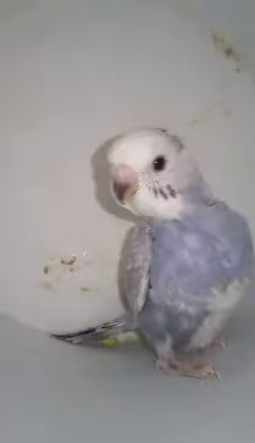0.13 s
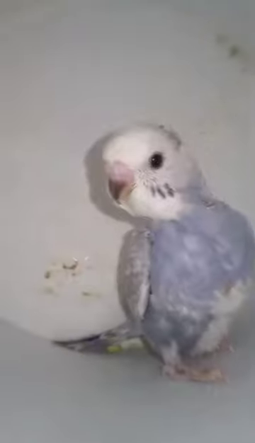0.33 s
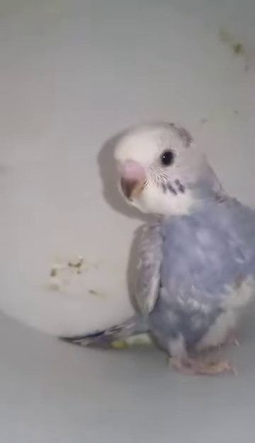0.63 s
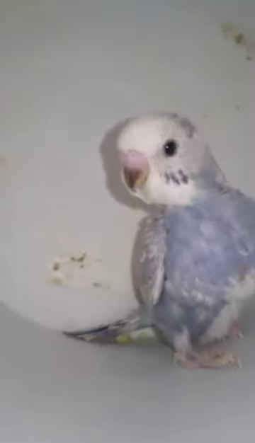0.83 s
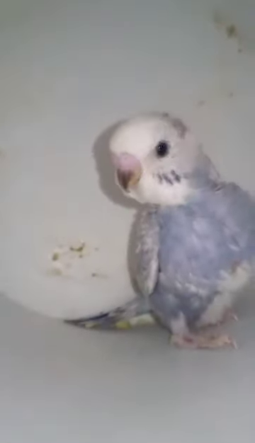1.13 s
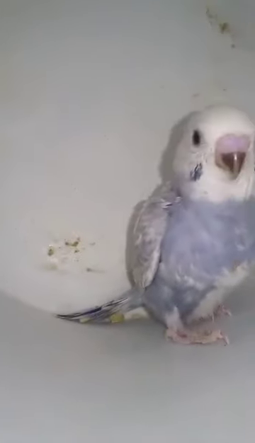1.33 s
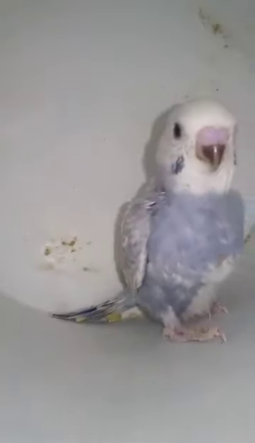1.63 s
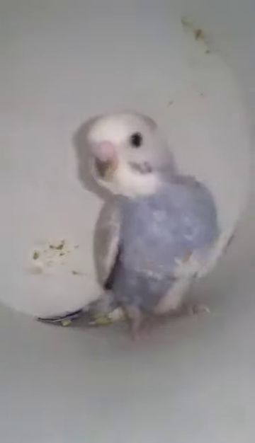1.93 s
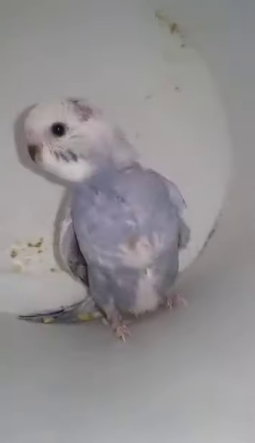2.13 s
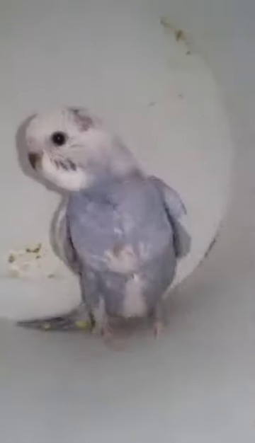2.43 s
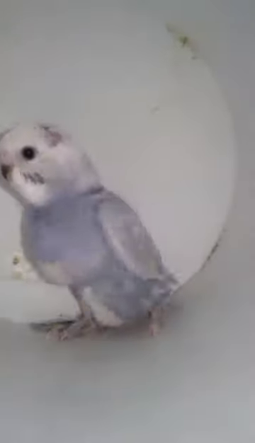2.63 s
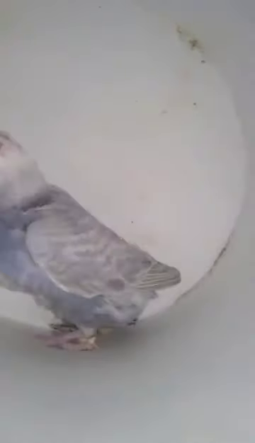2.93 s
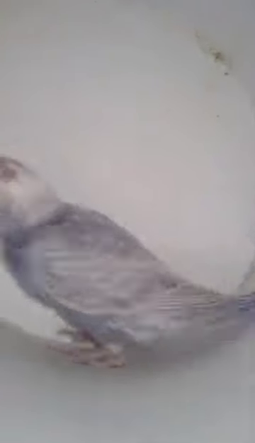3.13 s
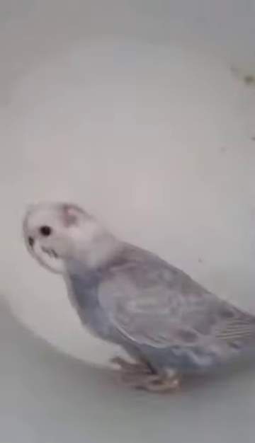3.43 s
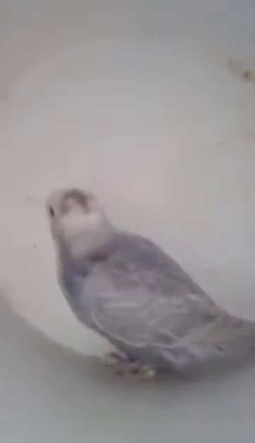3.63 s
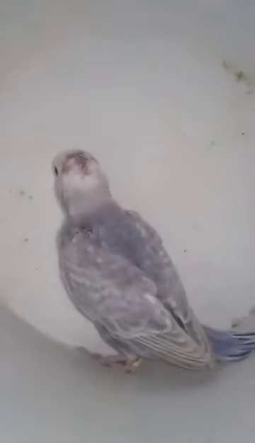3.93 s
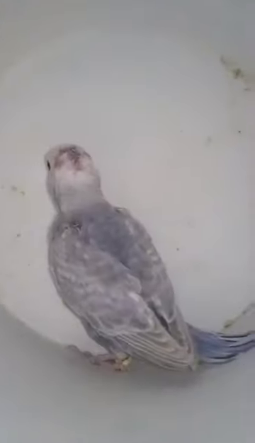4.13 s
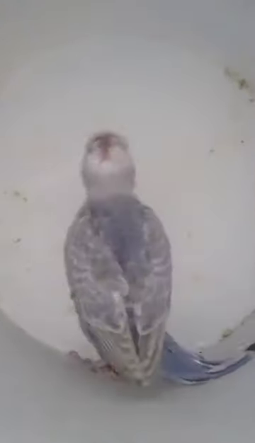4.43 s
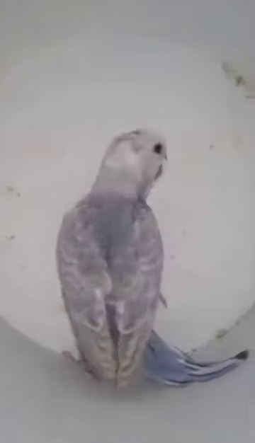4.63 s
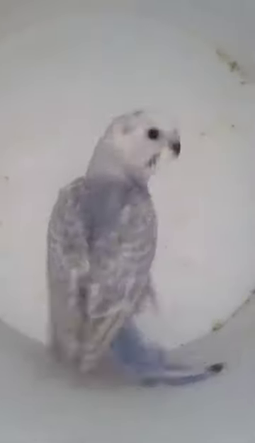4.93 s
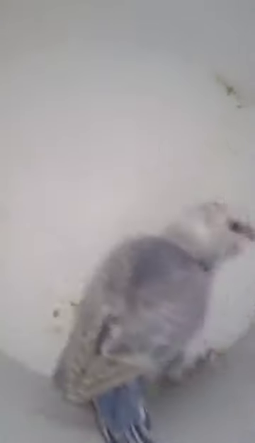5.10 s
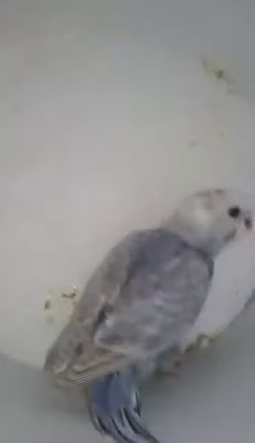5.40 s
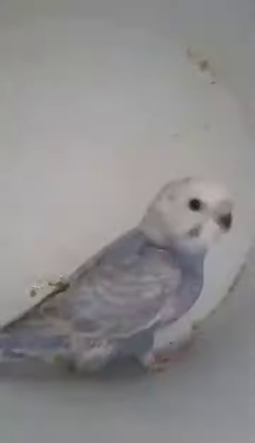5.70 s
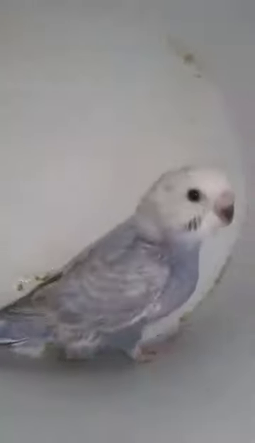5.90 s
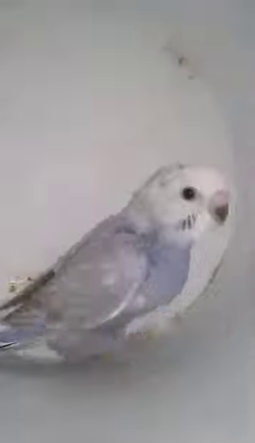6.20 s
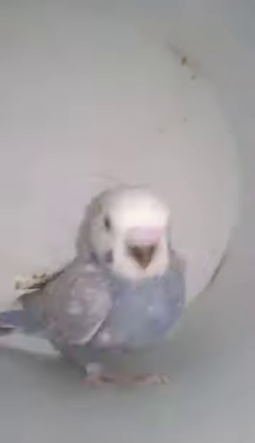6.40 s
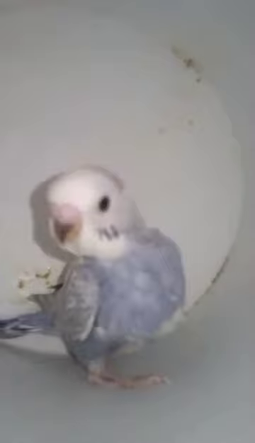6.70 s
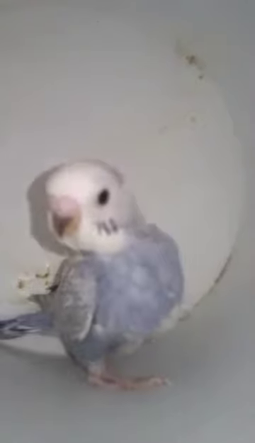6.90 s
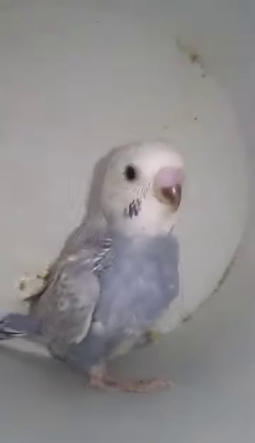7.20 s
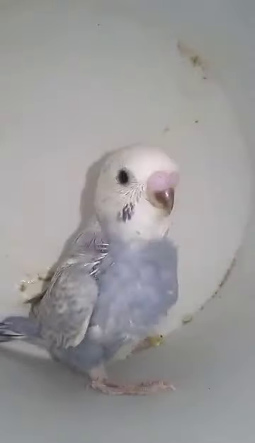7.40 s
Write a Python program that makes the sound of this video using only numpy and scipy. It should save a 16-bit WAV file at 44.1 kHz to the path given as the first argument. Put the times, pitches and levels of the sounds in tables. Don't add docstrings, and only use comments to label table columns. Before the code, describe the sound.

Budgerigars start faintly, then swell into a fast raspy hissing chatter in a hard room, with bowl knocks and sharp claw clicks.

```python
import sys
import numpy as np
from scipy import signal
from scipy.fft import rfft, irfft, next_fast_len
from scipy.io import wavfile
from scipy.ndimage import uniform_filter1d

SR = 44100
rng = np.random.default_rng(int(sys.argv[2]) if len(sys.argv) > 2 else 0)


def waveform_to_disk(signal):
    frames = np.transpose(np.atleast_2d(signal))
    scaled = np.clip(frames, -1, 1) * 32767
    samples = np.round(scaled).astype(np.int16)
    wavfile.write(sys.argv[1], SR, samples)


def natural_amplitude(level_db):
    exponent = np.asarray(level_db, float) / 20
    return 10 ** exponent


N = 332955


def highpass(x, hz):
    return signal.sosfilt(signal.butter(4, hz, "high", fs=SR, output="sos"), x)


def bandpass(x, low_hz, high_hz, order=2):
    return signal.sosfilt(signal.butter(order, [low_hz, high_hz], "band", fs=SR, output="sos"), x)


def rms_one(x):
    return x / np.sqrt(np.mean(x ** 2) + 1e-20)


def peak_one(x):
    return x / np.max(np.abs(x))


def in_time(rows, outside=None):
    s, *columns = np.transpose(rows)
    return [np.interp(np.arange(N) / SR, s, c, outside, outside) for c in columns]


def drift(rate, size):
    r = np.exp(-2 * np.pi * rate * 20 / SR)
    slow = signal.lfilter([1], [1, -2 * r, r * r], rng.standard_normal(size // 20 + 1002))[1000:]
    return np.interp(np.arange(size) / 20, np.arange(len(slow)), rms_one(slow))


def resonate(x, hz, width_hz):
    r = np.exp(-np.pi * width_hz / SR)
    turn = 2 * np.pi * hz / SR
    return signal.lfilter([(1 - r * r) / 2, 0, (r * r - 1) / 2], [1, -2 * r * np.cos(turn), r * r], x)


def resonate_twice(x, hz, width_hz):
    return resonate(resonate(x, hz, width_hz), hz, width_hz)


def ring(push, hz, t60):
    r, turn = natural_amplitude(-60 / (t60 * SR)), 2 * np.pi * hz / SR
    return signal.lfilter([0, np.sin(turn)], [1, -2 * r * np.cos(turn), r * r], push + 1e-18)


VALLEY_HZ, VALLEY_OCTAVES = 4240, 0.47


def patchy_noise(colour, edges_hz, levels_db, count, slow_db, fast_db, hollow_db=0, lifts=()):
    hz, db = np.transpose(colour)
    bands = np.geomspace(hz[0], hz[-1], count + 1)
    power = np.zeros(len(levels_db))
    groups, white = np.zeros((len(levels_db), N)), rng.standard_normal((2, N))
    for k, (low, high) in enumerate(zip(bands, bands[1:])):
        centre = np.sqrt(low * high)
        band = bandpass(white[k % 2], low, high)
        gain_db = np.interp(np.log(centre), np.log(hz), db)
        gain_db = gain_db + slow_db * drift(4.14, N) + fast_db * drift(24.7, N)
        for path_hz, lift_db, octaves in lifts:
            gain_db = gain_db + lift_db * np.exp(-(np.log2(centre / path_hz) / octaves) ** 2)
        group = np.searchsorted(edges_hz, centre)
        power[group] += np.mean((natural_amplitude(gain_db) * band) ** 2)
        valley = np.exp(-(np.log2(centre / VALLEY_HZ) / VALLEY_OCTAVES) ** 2)
        groups[group] += natural_amplitude(gain_db - hollow_db * valley) * band
    return sum(natural_amplitude(level) * group / np.sqrt(p) for level, group, p in zip(levels_db, groups, power))


def tone(rows, wobble):
    hz, *levels_db = in_time(rows)
    on = uniform_filter1d(in_time([(rows[0][0], 1), (rows[-1][0], 1)], 0)[0], size=900)
    phase = 2 * np.pi * np.cumsum(hz * (1 + wobble * drift(24.5, N))) / SR
    return on * sum(np.sqrt(2) * natural_amplitude(db) * np.sin((k + 1) * phase) for k, db in enumerate(levels_db))


# frequency in Hz, level in dB per Hz.
RUMBLE_COLOUR = [(18, -54), (30, -16.5), (125, -15), (166, -7), (293, -8), (387, -16), (459, -10),
                 (598, -14), (700, -10.5), (910, -54), (1540, -120)]
# start in seconds, end in seconds, rub in dB, bass weight in dB.
SHUFFLES = [(0.224, 0.556, -81, 23), (0.727, 0.824, -56, -16), (1.12, 1.546, -62.5, 3),
            (1.807, 2.034, -60.5, -4), (2.407, 2.655, -56.5, -2), (3.052, 3.28, -58, -8),
            (3.35, 3.596, -58.5, -7), (3.614, 3.935, -47, -6), (3.98, 4.257, -62.5, -18),
            (4.286, 4.434, -49.5, -25), (4.926, 5.186, -45.5, -12), (5.166, 5.4, -48, -5),
            (5.4, 5.578, -47, -5.5), (5.577, 5.786, -47.5, -8), (5.79, 6.074, -59, 0.5),
            (6.172, 6.384, -46.5, -18), (6.81, 7.2, -47, -12), (7.148, 7.38, -54, -13),
            (7.419, 7.6, -47.5, -9), (4.8, 4.87, -60, -3), (2.106, 2.2, -66, -8), (5.948, 6.057, -55, -15)]


def shuffling(bass_still_db=-70.5, mids_still_db=-68, edge_s=0.12):
    t = np.arange(N) / SR
    power = natural_amplitude([2 * bass_still_db, 2 * mids_still_db])[:, None] * np.ones(N)
    for start, end, db, bass_db in SHUFFLES:
        hold = np.clip(0.5 + np.minimum(t - start, end - t) / edge_s, 0, 1)
        power = power + np.outer(natural_amplitude([2 * (db + bass_db), 2 * db]), hold ** 2)
    return patchy_noise(RUMBLE_COLOUR, [160], 10 * np.log10(power), count=9, slow_db=1.5, fast_db=3.0)


# frequency in Hz, width in Hz, level in dB.
STANDING_WAVES = [(131, 14, 1), (348, 20, 1), (731, 28, 2), (846, 18, 4), (1011, 18, 3), (1471, 18, 4)]


def standing_waves(x):
    return sum(natural_amplitude(db) * resonate(x, hz, width_hz) for hz, width_hz, db in STANDING_WAVES)


# time in seconds, level in dB, shrillness in dB.
EFFORT = [(0, -39, -5.5), (.14, -51.5, 0.5), (.24, -57, 4), (.29, -51, 1), (.4, -48, -3.5),
          (.59, -48.5, -3), (0.899, -50, 1.5), (1.2, -47, -4.5), (1.75, -45.5, -3), (1.96, -48.5, 1),
          (1.975, -43, 1), (2.54, -36.5, 1.5), (2.86, -31.5, 3), (3.15, -29.5, 1), (3.41, -36, 2.5),
          (3.83, -29, 1.5), (4.46, -31, 3), (5.0, -34, -1.5), (5.14, -34.5, 2), (5.22, -33, 2),
          (5.3, -34.5, 4), (5.36, -33.5, 1), (5.45, -33.5, 2.5), (5.751, -35.5, -0.2), (6.311, -32.5, 2),
          (6.7, -31.5, -1), (7.55, -31, 1.5)]
# frequency in Hz, level in dB.
WASH_COLOUR = [(600, -25.5), (720, -16.5), (1100, -8.5), (1740, -7), (3460, -2), (4810, -3.5), (6430, -4),
               (9000, -8.5), (14000, -5)]
REGISTER_EDGES_HZ = (1800, 4400, 7200)
# time in seconds, lower resonance in Hz,
# upper resonance in Hz, chest weight in dB.
FAR_THROATS = [(0, 3200, 5600, 2), (.3, 2600, 5600, -4), (.6, 2600, 6400, -2), (.9, 2500, 5700, -4),
               (1.2, 2580, 5200, 1), (1.45, 2000, 5800, -2), (1.7, 1990, 5600, 0.5),
               (1.9, 3070, 6300, 2), (2.01, 4250, 6210, -4.5), (2.1, 2960, 5770, 0.5),
                (2.34, 4100, 5810, 1), (2.45, 3260, 5500, 1.5), (2.58, 4240, 6120, 3),
                (2.73, 3540, 5800, -1.5), (3.24, 3300, 6400, 0.5), (3.44, 3850, 5560, 0.5),
                (3.88, 3360, 6040, -1.5), (4.04, 3900, 5750, 1), (5.41, 2980, 6200, 0),
                (5.55, 4100, 6390, -0.5), (5.61, 2880, 5640, 1), (5.94, 4170, 6640, -1),
                (6.01, 3240, 6270, -0.5), (6.98, 3540, 5500, 1), (7.55, 3870, 5660, 0)]
# time in seconds, depth in dB.
HOLLOW = [(0.08, 0), (.17, 8), (.26, 4), (.5, 1.5), (.85, 3.5), (.92, 4), (1, 0.5), (2.3, 0), (2.5, 5.5),
          (2.7, 0.5), (3.0, -1), (3.2, 4), (3.4, -1.5), (3.7, 1), (3.95, -1), (4.2, -1), (5.1, 2),
          (5.2, 5.5), (5.28, 11), (5.34, 0.5), (5.7, 4), (5.9, 2), (7.55, -1)]


def chorus(swell, echo_db=(-42, -2.5, -3.5, -5.5), echo_s=0.035):
    level, shrill = in_time(EFFORT)
    low_hz, high_hz, chest_db = in_time(FAR_THROATS)
    lows = -41 + chest_db + 0.84 * (level + 31)
    steady = [lows, level, level + shrill, level + shrill - 4]
    r = np.exp(-1 / (echo_s * SR))
    low, high = signal.lfilter([1 - r], [1, -r], swell ** 2)
    levels = []
    for db, e_db, echo in zip(steady, echo_db, [low + high, low, high, high]):
        levels.append(10 * np.log10(natural_amplitude(2 * db) + natural_amplitude(2 * e_db) * echo))
    faint_db = (-37 - level).clip(0)
    return patchy_noise(WASH_COLOUR, REGISTER_EDGES_HZ, levels, count=26,
                        slow_db=1.8 + 0.12 * faint_db, fast_db=1.52,
                        hollow_db=in_time(HOLLOW)[0] + 0.27 * faint_db,
                        lifts=[(low_hz, 3, 0.57), (high_hz, 1, 0.15)])   # path, dB, octaves


# start in seconds, end in seconds, start in Hz, end in Hz, level in dB.
PEEPS = [(0.09, 0.19, 1650, 1750, -47), (0.2, 0.32, 2200, 2600, -55), (0.19, 0.25, 3100, 3800, -57),
         (0.39, 0.5, 1300, 1550, -52), (0.43, 0.46, 2800, 2300, -53), (0.1, 0.46, 5500, 5100, -50),
         (0.72, 0.92, 2560, 2600, -45.5), (0.55, 1.3, 2800, 2560, -54), (0.942, 1.06, 770, 723, -56),
         (1.027, 1.298, 2733, 2640, -38.5), (1.069, 1.177, 1493, 1700, -45.5),
         (1.287, 1.61, 1900, 1870, -47), (1.358, 1.5, 3840, 3880, -46), (1.06, 1.12, 3750, 4500, -40.5),
         (1.094, 1.218, 5160, 5100, -44), (3.061, 3.23, 520, 410, -53), (4.329, 4.547, 250, 342, -50.5),
         (4.492, 4.946, 230, 380, -54), (1.08, 1.16, 3200, 2500, -37), (0.93, 1.01, 5750, 5300, -49),
         (0.9, 1.0, 2260, 2240, -50), (4.85, 5.3, 1800, 1200, -41.5), (2.55, 3.45, 840, 1010, -48),
         (1.41, 1.5, 290, 340, -55), (1.15, 1.3, 320, 260, -49.5), (.35, .46, 2800, 3300, -55),
         (1.85, 1.92, 1200, 850, -56), (1.85, 1.92, 338, 306, -54), (0.72, 0.84, 800, 1400, -52.5)]


def peeps(breathy=0.032):
    out = np.zeros(N)
    for start, end, from_hz, to_hz, db in PEEPS:
        at, size = round(start * SR), round((end - start) * SR)
        phase = 2 * np.pi * np.cumsum(np.linspace(from_hz, to_hz, size)) / SR
        flutter = drift(breathy * to_hz + 20, SR)[:size]
        out[at:at + size] += natural_amplitude(db) * np.sqrt(np.hanning(size)) * flutter * np.sin(phase)
    return out


# time in seconds, pitch in Hz, then fundamental, octave and third partial in dB.
SQUEAK = [
    (.172, 1090, -58, -64, -66),
    (.19, 1120, -52, -62, -63),
    (.226, 1235, -50, -64, -65),
    (.33, 1265, -50, -64, -76),
    (.42, 1290, -49, -65, -75),
    (.47, 1265, -54, -66, -80),
    (.53, 1200, -66, -75, -85),
]


def squeak():
    return tone(SQUEAK, wobble=0.018) * (1.05 + 0.3 * drift(60.0, N))


# peak in seconds, leading resonance in Hz, level in dB, length in seconds.
SHRILL = [(0.284, 5800, -50, 0.08), (0.758, 6100, -53, 0.1), (1.366, 5640, -43.5, 0.032),
          (1.502, 5500, -38, 0.019), (1.55, 5800, -32.5, 0.031), (1.921, 6700, -34.5, 0.035),
          (2.172, 5970, -34, 0.022), (2.036, 6440, -44, 0.026), (1.973, 6750, -40, 0.022),
          (2.097, 5900, -36, 0.025), (2.246, 6400, -46, 0.034), (2.302, 6320, -36.5, 0.036),
          (2.755, 5250, -37, 0.035), (3.28, 5600, -32, 0.027), (3.38, 5860, -44, 0.029),
          (3.456, 5700, -35, 0.046), (3.532, 5800, -38, 0.036), (3.785, 6000, -28.5, 0.036),
          (4.595, 5500, -30, 0.023), (4.948, 6540, -33, 0.032), (5.079, 5600, -39, 0.024),
          (5.807, 5750, -30, 0.047), (6.413, 5900, -28.5, 0.029), (6.874, 5780, -35, 0.04),
          (7.411, 5400, -34, 0.06), (2.641, 6350, -26, 0.018), (2.794, 5280, -21, 0.041),
          (3.345, 5530, -33, 0.05), (3.73, 5900, -24, 0.045), (3.839, 6430, -24, 0.03),
          (3.904, 6320, -24.5, 0.043), (4.126, 5460, -24.5, 0.031), (4.244, 5720, -25.5, 0.086),
          (4.357, 5880, -29, 0.058), (4.418, 5500, -22, 0.016), (4.528, 6620, -26, 0.076),
          (4.668, 5400, -25.5, 0.025), (4.895, 6500, -28, 0.072), (5.013, 5800, -31.5, 0.056),
          (5.246, 5740, -24, 0.03), (5.339, 6130, -27.5, 0.041), (5.484, 6600, -34, 0.054),
          (5.604, 5710, -27, 0.052), (5.738, 6030, -28, 0.023), (5.859, 6530, -24, 0.053),
          (6.128, 6220, -29, 0.063), (6.559, 5880, -23, 0.051), (6.353, 6160, -31, 0.015),
          (6.82, 5770, -24.5, 0.021), (7.227, 5960, -24.5, 0.032)]
THROATY = [(0.984, 1790, -45.5, 0.084), (1.077, 2610, -39, 0.039), (1.139, 2380, -41, 0.016),
           (1.25, 2200, -44, 0.05), (1.85, 4570, -40, 0.019), (1.917, 3400, -37.5, 0.045),
           (1.978, 4380, -32, 0.032), (2.039, 3490, -34, .035), (3.585, 3700, -38, 0.021),
           (5.484, 3440, -35.5, 0.025), (5.525, 4360, -35.5, 0.037), (7.522, 4250, -34, 0.026),
           (2.104, 2800, -36, 0.06), (2.235, 3540, -33.5, 0.034), (2.17, 4690, -32.5, 0.028),
           (2.374, 4000, -31.5, 0.026), (2.585, 4300, -27, 0.027), (2.701, 4030, -29.5, 0.026),
           (2.905, 2760, -35, 0.031), (3.062, 4030, -26.5, 0.043), (3.128, 3120, -28, 0.038),
           (3.182, 3310, -26.5, 0.041), (3.486, 4260, -34, 0.0097), (3.65, 3830, -28, 0.044),
           (4.077, 4050, -29.5, 0.037), (4.168, 4400, -30, 0.016), (5.598, 2930, -29.5, 0.053),
           (6.07, 2830, -32, 0.014), (6.427, 2350, -35, 0.064), (6.498, 3020, -34.5, 0.064),
           (6.623, 4120, -27.5, 0.087), (6.895, 4600, -24.5, 0.049), (6.996, 4200, -27, 0.056),
           (7.07, 3700, -30, 0.035), (7.177, 4330, -25, 0.051), (7.291, 3690, -26.5, 0.022),
           (7.341, 2670, -29.5, 0.016), (7.453, 4240, -33, 0.086)]
LOW_HZ, HIGH_HZ, SCATTER = 3550, 5800, 0.151


def syllables(patter_from_s=1.98, gap_s=0.062, clear_s=0.04, rest_s=(5.05, 6.3)):
    at, level, shrill = np.transpose(EFFORT)
    rows = [(s, hz / 2, db - 12.5, hz, db, length) for s, hz, db, length in SHRILL]
    for s, hz, db, length in THROATY:
        high_hz = HIGH_HZ * (1 + SCATTER * rng.uniform(-1.19, 1))
        rows.append((s, hz, db, high_hz, db - 10 + 3.8 * np.interp(s, at, shrill), length))
    taken = np.array(rows)[:, 0]
    for s in np.arange(patter_from_s, N / SR, gap_s):
        a, b, c, d, e, f = rng.uniform(-0.57, 1, size=6)
        db = np.interp(s, at, level) - 7
        if np.min(np.abs(taken - s)) > clear_s and not rest_s[0] < s < rest_s[1]:
            high_db = db + np.interp(s, at, shrill) + 4 * e
            rows.append((s + 0.0075 * a, LOW_HZ * (1 + 2 * SCATTER * b), db + 4 * c,
                         HIGH_HZ * (1 + SCATTER * d), high_db, 0.027 * 2 ** (0.73 * f)))
    return rows


def throat(air, hz, width_hz):
    broad = resonate_twice(air, hz, width_hz)
    return rms_one(broad) + natural_amplitude(-7) * rms_one(resonate(broad, hz, 150))


def chatter():
    out, beat, swell = np.zeros(N + SR), np.zeros(N + SR), np.zeros((2, N + SR))
    t = np.arange(SR // 4) / SR
    for s, low_hz, low_db, high_hz, high_db, length in syllables():
        air = rng.standard_normal(len(t)) * natural_amplitude(-2.0 * np.clip(drift(180.0, len(t)), -3, 1.6))
        low = throat(air, low_hz, 400)
        high = throat(air, high_hz, 550)
        fifth = rms_one(resonate_twice(air, 1.5 * high_hz, 260))
        high = rms_one(high) + natural_amplitude(-13.5 + min(high_db - low_db, 0)) * fifth
        rasp = natural_amplitude(1.5) * rms_one(resonate(air, 7600, 10800))
        rasp = rasp + natural_amplitude(-2) * rms_one(np.diff(air, prepend=0))
        rise = 0.49 * length
        fade = np.exp(-((t - rise).clip(0) / (0.43 * length)) ** 0.43)
        shape = np.where(t < rise, (t / rise) ** 1.27, fade)
        voice = natural_amplitude(low_db) * rms_one(low) + natural_amplitude(high_db) * rms_one(high)
        voice = voice + natural_amplitude((low_db + high_db) / 2) * rasp
        at = round((s - rise) * SR)
        out[at:at + len(t)] += shape * voice
        beat[at:at + len(t)] += shape
        swell[:, at:at + len(t)] += np.outer(natural_amplitude([low_db, high_db]), shape)
    return highpass(out[:N], 900), beat[:N].clip(0, 1), swell[:, :N]


# start in seconds, peak in seconds, end in seconds, pitch in Hz, level in dB.
HUM = [
    (0.29, 0.327, 0.41, 88.6, -49),
    (.43, 0.483, 0.52, 89.7, -50),
    (0.835, 1.052, 1.24, 90.8, -46),
    (2.433, 2.48, 2.7, 85, -52),
    (6.163, 6.29, 6.55, 95.3, -52.5),
    (6.853, 7.023, 6.95, 83.6, -50),
]


def hum():
    out = 0
    for start, top, end, hz, db in HUM:
        path = [(start, hz, db - 14), (top, hz, db), (end, 0.937 * hz, db - 7)]
        out = out + tone(path, wobble=0.05) * natural_amplitude(4 * drift(14, N))
    return out


def puffs():
    return 1.2 * drift(160, N)


# peak in seconds, length in seconds, level in dB, throat in Hz,
# broad part in dB.
HISSES = [
    (0.725, 0.11, -41.5, 11400, -4),
    (1.541, 0.13, -26.5, 5400, -1.5),
    (2.808, 0.07, -26.5, 5600, -8),
    (4.503, 0.045, -32, 6130, -16),
    (5.845, 0.13, -21.5, 6370, -12.5),
    (5.968, 0.16, -35, 2760, -25),
    (6.103, 0.17, -27.5, 6500, -0.5),
    (6.61, 0.17, -26, 5860, -3.5),
]


def hisses(throat_width_hz=2200, rise_share=0.3):
    t, out, air = np.arange(N) / SR, 0, rng.standard_normal((2, N))
    broad = rms_one(bandpass(air[0], 1740, 13000))
    for s, length, db, hz, broad_db in HISSES:
        away = np.where(t < s, (s - t) / rise_share, t - s) / length
        open_throat = rms_one(resonate_twice(air[1], hz, throat_width_hz))
        out = out + natural_amplitude(db) * np.exp(-1.8 * away ** 2) * (open_throat + natural_amplitude(broad_db) * broad)
    return out * natural_amplitude(0.8 * drift(40, N) + puffs())


# time in seconds, peak in dB, thud pitch in Hz, bowl strength in dB.
KNOCKS = [(0.731, -44, 70.0, -15), (1.133, -13.5, 373, -3.5), (1.942, -33, 69.5, -9),
          (2.158, -48, 94.2, -7), (2.33, -45, 61.9, -3), (1.318, -49, 109, -20), (1.365, -46, 95, -20),
          (1.445, -47, 95, -15), (1.92, -44, 150, -20), (2.838, -42.5, 354, -17), (2.985, -41, 346, -30),
          (3.202, -34, 75, 7), (3.734, -26, 199, -5), (4.329, -26, 353, -4), (4.915, -44, 67.5, -3),
          (4.992, -35, 126, -25), (5.072, -31.5, 463, -25), (5.543, -38, 174, -17), (6.264, -36, 370, -7),
          (7.03, -38, 92, -29)]
# frequency in Hz, level in dB, t60 in seconds.
BOWL = [(83, 19, 0.17), (126, 13.5, 0.25), (199, -4, 0.4), (238, -5, 0.26), (308, -9, 0.4), (354, -6, 0.35),
        (460, -13, 0.16), (770, -7, 0.092), (1060, -18, 0.19)]


def knocks(puff_db=-17.5, puff_s=0.013):
    out, strengths = np.zeros(N + SR), rng.normal(0, 2, (len(KNOCKS), len(BOWL)))
    noise, impulse = rng.standard_normal(N + SR), np.eye(1, SR // 2)[0]
    fade = np.exp(-np.arange(SR // 2) / (puff_s * SR))
    for (s, peak_db, thud_hz, bowl_db), chance_db in zip(KNOCKS, strengths):
        push = bandpass(impulse, 0.5 * thud_hz, 2.5 * thud_hz, order=3)
        body = ring(push, thud_hz, 0.045 + 15.0 / thud_hz)
        for (hz, level_db, t60), d in zip(BOWL, chance_db):
            body += natural_amplitude(level_db + d + bowl_db) * ring(push, hz, 0.45 * t60)
        at = round(s * SR)
        puff = resonate_twice(noise[at:at + len(body)], thud_hz, thud_hz) * fade
        out[at:at + len(body)] += natural_amplitude(peak_db) * (peak_one(body) + natural_amplitude(puff_db) * peak_one(puff))
    return out[:N]


# time in seconds, peak in dB, ring in Hz, t60 in seconds, crack in dB.
CLICKS = [(1.803, -31, 2240, 0.0049, 12), (1.816, -32, 2240, 0.012, -8), (1.922, -21, 7050, 0.0035, 3),
          (2.7893, -9, 5450, .006, -8), (5.2403, -23, 5640, .008, -12), (2.426, -6, 2370, 0.0026, -30),
          (2.4431, -12.5, 5300, 0.004, -16), (2.542, -18.5, 4400, 0.002, 12.5),
          (2.836, -18, 2110, .008, -20), (2.9839, -10, 2270, 0.025, -25), (3.628, -10, 2350, 0.004, -17),
          (4.425, -9, 5370, .004, -5), (5.5047, -12, 3350, 0.0059, -8), (3.205, -18.5, 1710, .012, -15),
          (3.238, -21, 1930, 0.016, -15)]


def clicks():
    out, tick = np.zeros(N + SR), np.eye(1, SR // 10)[0]
    for s, peak_db, hz, t60, crack_db in CLICKS:
        modes = ring(tick, hz, t60) + 0.61 * ring(tick, 1.35 * hz, 0.0032)
        body = resonate(modes, 1.1 * hz, 1.2 * hz)
        sound = peak_one(body) + natural_amplitude(crack_db) * ring(tick, 8000, 0.0011)
        at = round(s * SR)
        out[at:at + len(tick)] += natural_amplitude(peak_db - 1.5) * sound
    return highpass(out[:N], 1500)


def room(x, t60):
    t = np.arange(SR // 2) / SR
    tail = rng.standard_normal(len(t)) * natural_amplitude(-60 * t / t60) * np.clip(t / 0.0033, 0, 1)
    return signal.fftconvolve(x, tail / np.sqrt(np.sum(tail ** 2)))[:N]


def scene():
    voices, beat, swell = chatter()
    ticks, thin = clicks(), squeak()
    far = chorus(swell)
    near = natural_amplitude(-4.5) * far * natural_amplitude(6 * beat + puffs())
    wash = near + natural_amplitude(-7.0) * room(far, t60=0.36)
    wet = natural_amplitude(-2) * room(voices + 0.39 * ticks + thin, t60=0.21)
    rumble = shuffling()
    mono = rumble + standing_waves(far + rumble) + wash + wet
    mono = mono + peeps() + thin + voices + hum() + hisses() + knocks() + ticks
    return np.array([mono, mono])


# frequency in Hz, gain in dB.
MICROPHONE = [(20, -24), (60, -2), (6800, -1), (7300, -10), (7750, -13), (8080, -10.5), (8350, -10.5),
              (8900, -7), (9800, -13), (10800, -19), (12000, -21), (14000, -23)]


def microphone(x):
    hz, db = np.transpose(MICROPHONE)
    size = next_fast_len(N + 4096)
    bins_hz = np.arange(size // 2 + 1) * SR / size
    gain = natural_amplitude(np.interp(np.log(bins_hz + 1), np.log(hz), db))
    return irfft(rfft(x, size) * gain, size)[:N]


# frequency in Hz, threshold in dB over the local mean.
GATE = [(7000, -30), (7400, -12), (7700, -9), (8080, -4), (8400, -18), (9600, -10), (10600, 1.5),
        (11800, 6.5), (13000, 4.5), (14000, 5)]


def treble_gate(x, quiet_db=-62, chance_db=3):
    hz, t, z = signal.stft(x, SR, nperseg=2048, noverlap=1024)
    power = np.abs(z) ** 2 + 1e-20
    local = uniform_filter1d(uniform_filter1d(power, size=40, axis=0), size=3, axis=1)
    quiet = np.clip(quiet_db - 10 * np.log10(power[100:320].mean(axis=0)), 0, 20)
    whim = uniform_filter1d(rng.standard_normal((65, len(t))), size=2, axis=1) * 1.6
    over_db = np.interp(hz, *np.transpose(GATE), left=-99)[:, None]
    over_db = over_db + 0.44 * quiet * (hz[:, None] < 10000)
    limit_db = 10 * np.log10(local) + over_db + chance_db * np.repeat(whim, 16, axis=0)[:len(hz)]
    kept = 10 * np.log10(uniform_filter1d(power, size=2, axis=0)) > limit_db
    return signal.istft(z * kept, SR, nperseg=2048, noverlap=1024)[1][:N]


def band_limit(x):
    return signal.sosfilt(signal.butter(12, 14370, fs=SR, output="sos"), x)


def record(dry):
    gated = treble_gate(microphone(dry[0]))
    cut = signal.sosfilt(signal.cheby2(14, 60, 14300, fs=SR, output="sos"), gated)
    return band_limit(np.array([cut, cut]))


dry = scene()
out = record(dry)
waveform_to_disk(out)
```